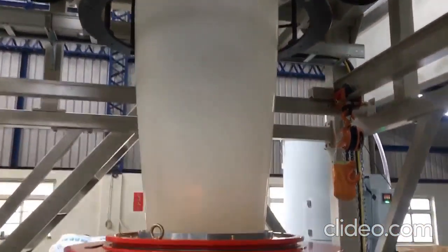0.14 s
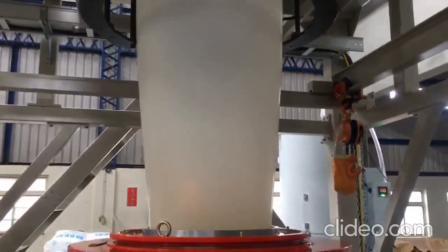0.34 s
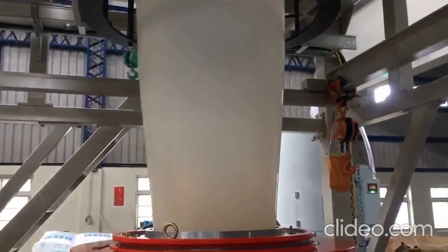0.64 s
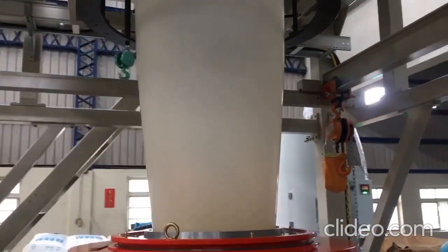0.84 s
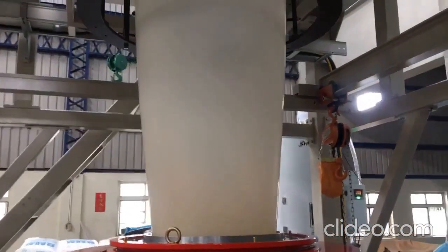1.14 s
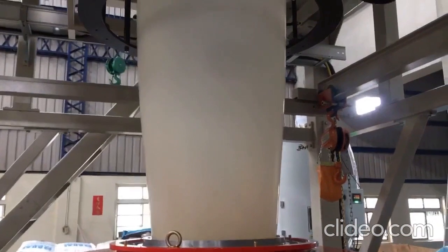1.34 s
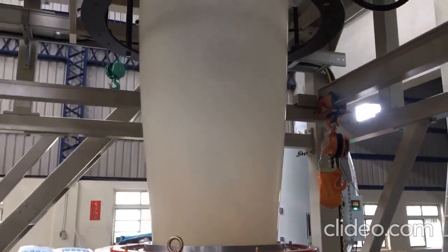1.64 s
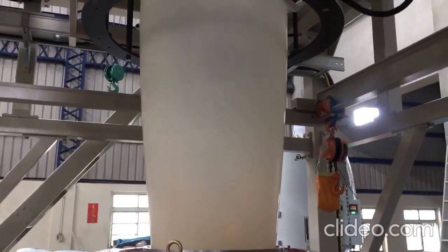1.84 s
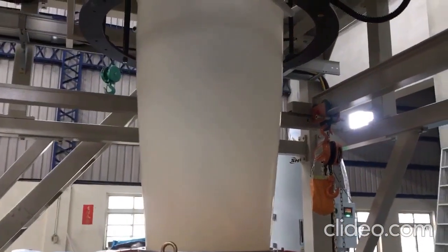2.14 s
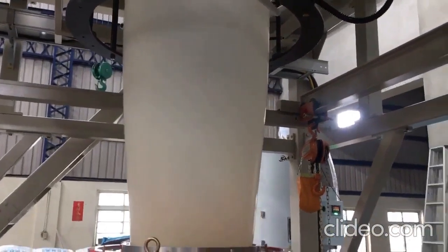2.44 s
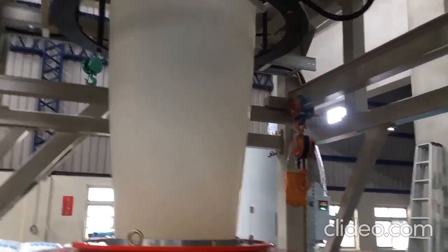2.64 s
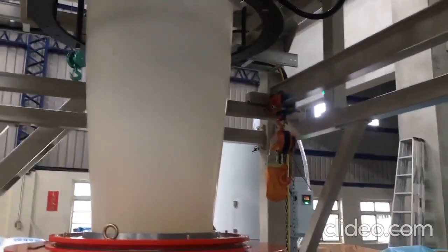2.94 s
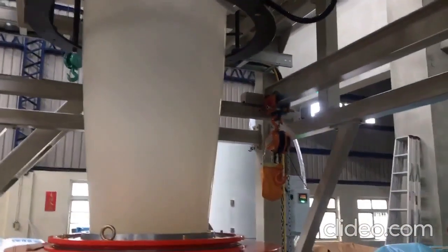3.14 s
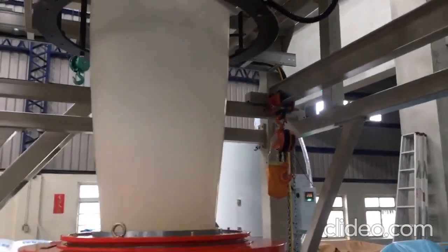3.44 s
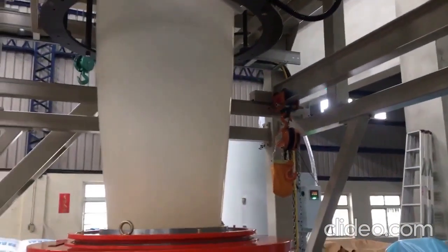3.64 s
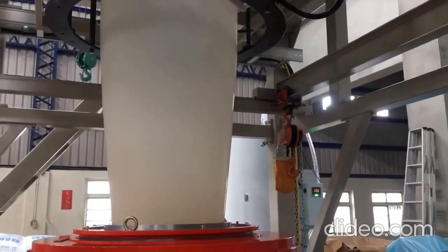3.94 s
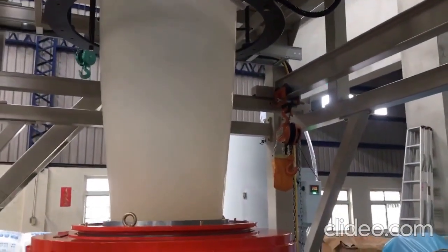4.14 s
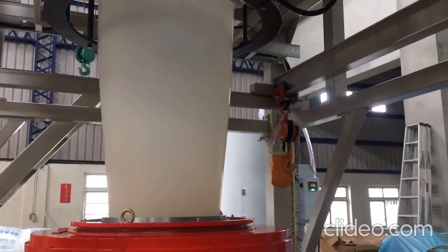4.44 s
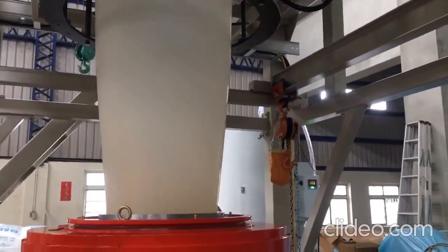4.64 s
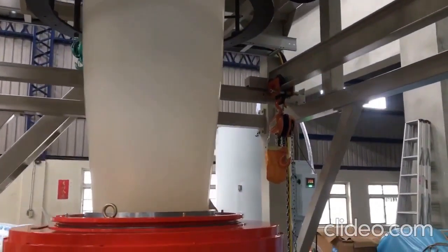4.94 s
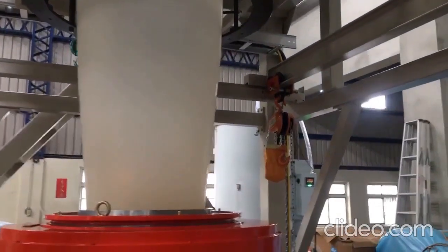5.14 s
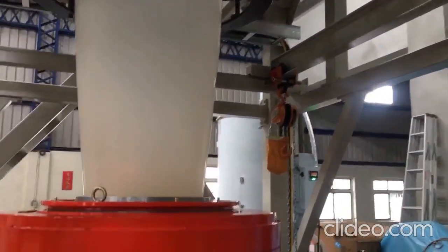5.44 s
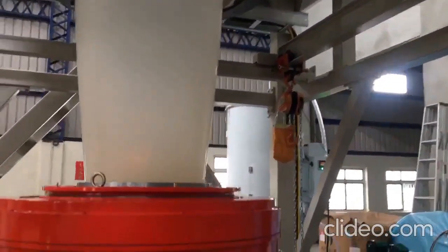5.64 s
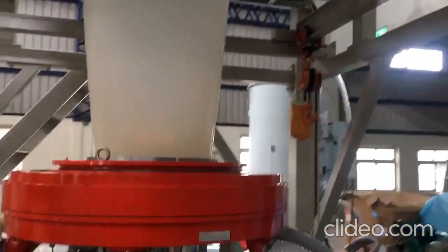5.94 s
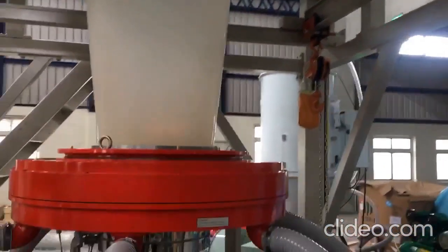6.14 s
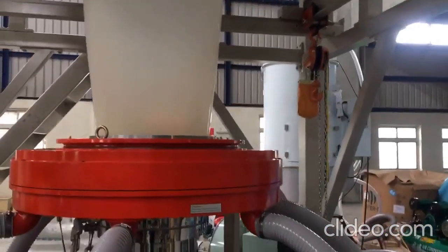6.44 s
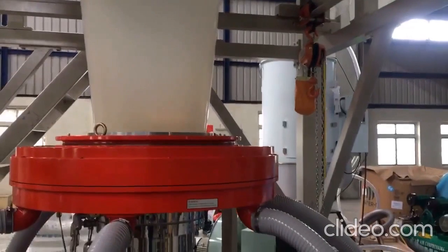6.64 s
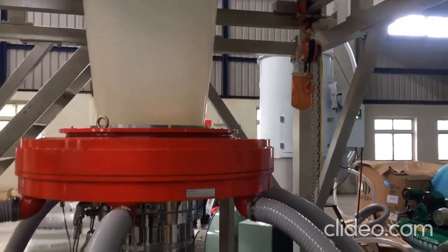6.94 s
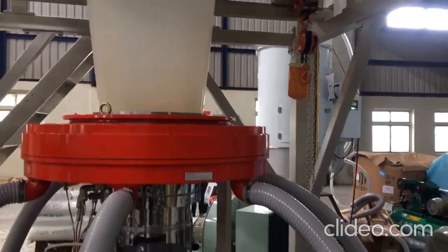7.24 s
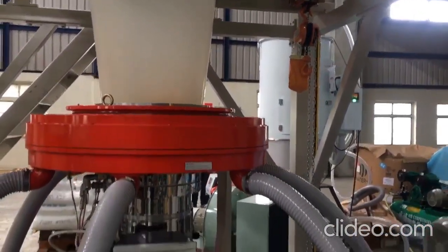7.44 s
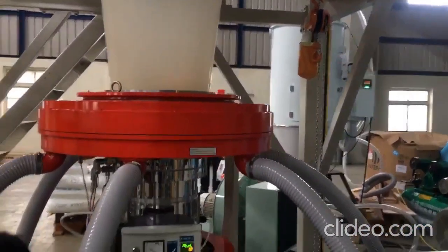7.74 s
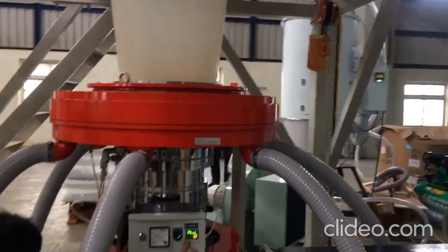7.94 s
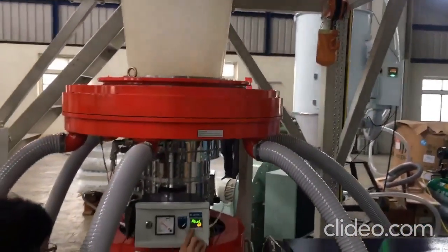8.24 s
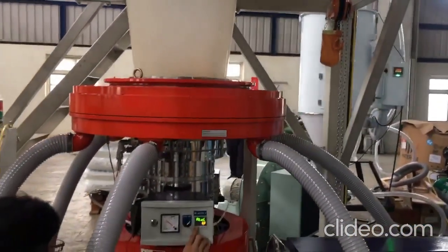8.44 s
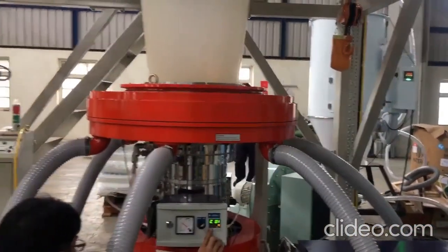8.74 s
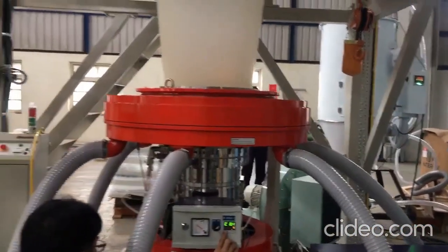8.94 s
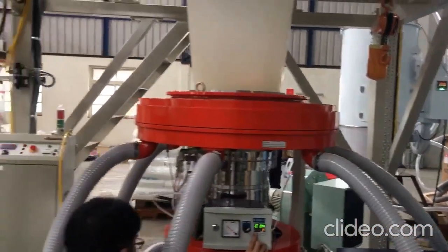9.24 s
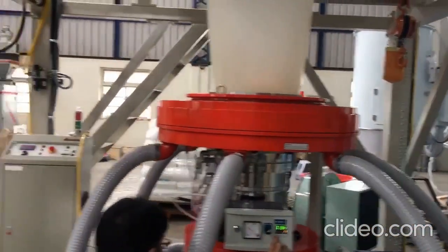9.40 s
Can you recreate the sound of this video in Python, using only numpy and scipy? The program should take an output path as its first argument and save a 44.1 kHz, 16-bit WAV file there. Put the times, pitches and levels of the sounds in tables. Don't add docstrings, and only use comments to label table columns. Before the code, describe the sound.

Continuous factory machine noise: low humming fan rumble, hollow rushing air and piercing electric drive whine that swells and fades, with one tiny air spit.

```python
import sys
import numpy as np
from scipy import signal
from scipy.fft import rfft, irfft, next_fast_len
from scipy.io import wavfile
from scipy.ndimage import uniform_filter1d, map_coordinates

SR = 44100
rng = np.random.default_rng(int(sys.argv[2]) if len(sys.argv) > 2 else 0)


def ratio_of_db(decibels):
    return 10 ** (np.asarray(decibels, float) / 20)


def store_pcm(level_fs):
    pcm = np.round(np.clip(level_fs, -1, 1) * 32767).astype(np.int16)
    wavfile.write(sys.argv[1], SR, np.atleast_2d(pcm).T)


N = 422037

# (frequency [Hz], density [dB per Hz])
RUMBLE_SPECTRUM = [(12, -51), (20, -25.5), (56, -10), (108, -8), (133, -6), (151, 1.5), (257, -0.5),
                   (283, -4), (312, -8), (369, -4), (442, -11.5), (560, -22), (730, -29.5), (1230, -120)]
ROAR_SPECTRUM = [(350, -58), (480, -6.5), (600, -1), (730, -3.5), (1000, -3), (1190, -6), (1650, -7.5),
                 (1800, -3), (2100, -6.5), (2450, -13.5), (2660, -22.5), (2900, -34)]
SLOT_SPECTRUM = [(2300, -31), (2550, -5), (2670, -8), (2800, -1), (3400, -1), (3800, -1), (4000, -6),
                 (4100, -5.5), (4400, -32.5)]
HISS_SPECTRUM = [(3900, -33), (4100, 1), (4400, 0.5), (4820, -2), (4930, -4), (5150, -1.5), (5900, -3),
                 (6150, -3.5), (6700, -4), (7200, -6.5), (7600, -7), (8600, -7), (9300, -5)]
# (frequency [Hz], density [dB per Hz])
FUZZ_SPECTRUM = [(7200, -27), (7500, -11), (8000, 0), (8150, -4), (8300, -6.5), (8520, -9), (8650, -14),
                 (9300, -20)]

# (frequency [Hz], width [Hz], level over the rumble [dB])
CASING_MODES = [(145.7, 13, 6.5), (163, 3.3, -0.5), (184.7, 7.6, 5.5), (237.4, 5.6, -5), (297, 32, 2),
                (333.6, 7.5, 3.5), (73, 6.8, -4)]
# (frequency [Hz], width [Hz], level [dB])
LOW_HOSE_MODES = [(620, 45, -2), (658, 55, 0), (692, 30, -4)]
HIGH_HOSE_MODES = [(1005, 40, -4), (1040, 60, 0), (1095, 55, -1.5)]
# (frequency [Hz], width [Hz], level over the roar [dB])
RING_MODES = [(785, 55, 4), (840, 55, 4), (900, 45, 3), (1238, 26, 7), (1295, 18, 4.5), (1347, 16, 1),
              (1430, 30, 6), (1575, 32, 6), (1755, 45, 3), (2000, 35, 1), (2135, 35, 0)]
# (frequency [Hz], width [Hz], level over the slot noise [dB])
LIP_MODES = [(2545, 60, 1), (2795, 90, 2), (2925, 45, 1), (3120, 70, 1), (3280, 90, 0), (3720, 100, 0)]

# (frequency [Hz], mean level [dB])
MACHINE_TONES = [(484.7, -54), (1656.9, -49), (4085, -67), (4884.7, -78), (4962.2, -75), (5028.3, -74),
                 (5110.5, -68), (5908, -79), (6684.8, -76), (6935, -79)]
FIRST_SIDEBANDS = [-72.0, -79.0, -78.0, -70.0, -75.0, -77.0, -71.0, -73.0, -74.0, -70.0, -71.0, -73.0,
                   -65.0, -67.0, -68.0, -63.0, -60.0, -57.0, -55.0, -51.0, -57.0, -54.0, -53.0, -64.0,
                   -66.0, -65.0, -72.0]
SECOND_SIDEBANDS = [-65.0, -63.0, -71.0, -51.0, -56.0, -74.0, -52.0, -60.0, -81.0, -65.5, -67.0, -85.0,
                    -69.0, -72.0]
THIRD_SIDEBANDS = [-73.0, -73.0, -64.0, -69.0, -70.0, -68.0]
LOWEST_ORDERS = (-19, -3, -2)

# (time [s], length [s], frequency [Hz])
WHISTLE = (.78, .58, 6165)
# (time [s], length [s], frequency [Hz])
SPIT = (5.33, .03, 5200)

# (time [s], distance nearer the drives [m])
WALK_PATH = [
    (0, 0),
    (2.9, .06),
    (4.6, .03),
    (5.2, .12),
    (6.2, .27),
    (7, .22),
    (8, .18),
    (8.6, .17),
    (9.6, .05),
]
# (time [s], turn from the blower [0-1], tilt under the slot's air [0-1])
MIC_AIM = [
    (0, 0.3, 0.5),
    (1.3, 0.1, 0),
    (4.6, 0.4, .3),
    (5.6, 0.1, 1),
    (6.4, 0.18, 0.8),
    (7.2, 0.5, 1),
    (8.8, 1, 0.5),
    (9.6, 0.4, 0),
]
# (rumble [dB], low hose [dB], high hose [dB], roar [dB])
TURN_LOSS = (1.6, 2, 0.66, 0.31)
# (slot [dB], hiss [dB])
TILT_LOSS = (2, 0.55)

# (time [s], length [s], gain [dB])
LOW_HOSE_CRESTS = [
    (.5, 0.94, 5.5),
    (1.5, .9, 2.5),
    (2.85, .5, 4.5),
    (4.3, 1.4, 4),
    (5.65, 0.85, 7),
    (6.6, .6, 5.5),
    (7.5, 0.32, 2),
]
HIGH_HOSE_CRESTS = [
    (.05, 0.43, 2.2),
    (1.65, .6, 1.9),
    (3.4, 1.1, 2.5),
    (4.6, 1.1, 3),
    (5.65, .9, 2.8),
    (8.6, 0.9, 1.8),
]
# (time [s], length [s], gain [dB])
FIRST_WHINE_CRESTS = [
    (0, .3, 3.5),
    (.75, .5, 5),
    (3.1, 0.64, 2.5),
    (4.2, .8, 4),
    (5.75, .5, 4.5),
    (6.25, 0.46, 3),
    (7.1, .5, 1.5),
    (8.15, .3, 2.1),
    (8.75, .5, 5),
]
SECOND_WHINE_CRESTS = [
    (.6, .4, 2.5),
    (1.15, .5, 4.4),
    (1.8, 0.57, 5),
    (2.7, 1.1, 5.8),
    (4.1, 0.51, 3),
    (5.05, .6, 3.3),
    (5.7, 0.37, 2.4),
    (8.9, .4, 1.4),
]


def unit(x):
    return x / np.sqrt(np.mean(np.abs(x) ** 2) + 1e-20)


def curves(rows):
    s, *cols = np.transpose(rows)
    return [np.interp(np.arange(N) / SR, s, c) for c in cols]


def wobble(rate):
    return map_coordinates(rng.standard_normal(200), [np.arange(0, N, 64) * rate / SR])


def crests(rows):
    t = np.arange(0, N, 64) / SR
    swells = sum(db * np.exp(-(2 * (t - s) / length) ** 2) for s, length, db in rows)
    return np.interp(np.arange(N) / SR, t, swells)


def humps(modes, hz):
    return sum(ratio_of_db(db) ** 2 / (1 + (2 * (hz - c) / w) ** 2) ** 1.88 for c, w, db in modes)


def rush(spectrum=None, modes=(), patchy_db=1.2):
    z = signal.stft(rng.standard_normal(N + 8192), nperseg=1024)[2]
    patches = uniform_filter1d(rng.standard_normal(z.shape), size=5, axis=0)
    patches = uniform_filter1d(patches, size=12, axis=1)
    noise = signal.istft(z * ratio_of_db(patchy_db * unit(patches)), nperseg=1024)[1]
    m = next_fast_len(len(noise))
    hz = np.fft.rfftfreq(m, 1 / SR)[:m // 4]
    gain = np.sqrt(humps(modes, hz) + (spectrum is not None))
    if spectrum is not None:
        f, db = np.transpose(spectrum)
        gain = gain * ratio_of_db(np.interp(np.log(hz + 1), np.log(f + 1), db, left=-120, right=-120))
    return unit(irfft(rfft(noise, m)[:m // 4] * gain, m)[:N])


def tone(hz, paths):
    turn = lambda n: np.exp(2j * np.pi * hz / SR * n)
    blocks = np.outer(paths * turn(np.arange(0, N, 64)), turn(np.arange(64)))
    return np.sqrt(2) * blocks.imag.ravel()[:N]


def fading(hz, db, rate):
    return tone(hz, ratio_of_db(db) * unit(wobble(rate) + 1j * wobble(rate)))


def walked(hz, db):
    near = np.interp(np.arange(0, N, 64) / SR, *np.transpose(WALK_PATH))
    sway_hz, fades_per_m, sound_m_s = 1.8, 25, 343
    travelled = np.cumsum(np.abs(np.gradient(near)))
    clock = sway_hz * np.arange(0, N, 64) / SR + fades_per_m * travelled
    re, im = (map_coordinates(knots, [clock]) for knots in rng.standard_normal((2, 60)))
    direct = 1.0
    flutter = ratio_of_db(1.2 * wobble(14)) * np.exp(.5j * wobble(5))
    shift = np.exp(2j * np.pi * (hz * near / sound_m_s + rng.random()))
    return tone(hz, ratio_of_db(db) * unit((direct + re + 1j * im) * flutter * shift))


def blower():
    full_db = np.array([[-28], [-39], [-36], [-30.5]])
    rumble_db, low_db, high_db, roar_db = full_db - np.outer(TURN_LOSS, curves(MIC_AIM)[0])
    rumble = ratio_of_db(rumble_db) * rush(RUMBLE_SPECTRUM, CASING_MODES, patchy_db=-0.55)
    low = ratio_of_db(low_db + crests(LOW_HOSE_CRESTS)) * rush(modes=LOW_HOSE_MODES, patchy_db=-0.4)
    high = ratio_of_db(high_db + crests(HIGH_HOSE_CRESTS)) * rush(modes=HIGH_HOSE_MODES, patchy_db=1.1)
    roar = ratio_of_db(roar_db) * rush(ROAR_SPECTRUM, RING_MODES, patchy_db=1.18)
    return rumble + low + high + roar


def slot_air():
    full_db = np.array([[-44], [-48.5]])
    slot_db, hiss_db = full_db - np.outer(TILT_LOSS, curves(MIC_AIM)[1])
    slot = ratio_of_db(slot_db) * rush(SLOT_SPECTRUM, LIP_MODES, patchy_db=1.95)
    return slot + ratio_of_db(hiss_db) * rush(HISS_SPECTRUM, patchy_db=2.47)


def drive(centre_hz, family, lowest, gain_db):
    run_hz = 41.72
    return sum(walked(centre_hz + k * run_hz, db + gain_db) for k, db in enumerate(family, lowest))


def drives():
    first = drive(7978.1, FIRST_SIDEBANDS, LOWEST_ORDERS[0], gain_db=0.1)
    second = drive(8338.6, SECOND_SIDEBANDS, LOWEST_ORDERS[1], gain_db=0.3)
    third = drive(7535.1, THIRD_SIDEBANDS, LOWEST_ORDERS[2], gain_db=-1.0)
    whine = ratio_of_db(crests(FIRST_WHINE_CRESTS)) * (first + third) + ratio_of_db(crests(SECOND_WHINE_CRESTS)) * second
    return whine + ratio_of_db(-51.5) * rush(FUZZ_SPECTRUM, patchy_db=0.0)


def gears_and_blades():
    return sum(fading(hz, db - .7, rate=3.5) for hz, db in MACHINE_TONES)


def whistle():
    s, length, hz = WHISTLE
    swell = np.clip(1 - (2 * (np.arange(N) / SR - s) / length - 1) ** 4, 0, 1)
    breath = ratio_of_db(-60) * rush(modes=[(hz, 40, 0)], patchy_db=0)
    pitch = tone(hz, ratio_of_db(-59.5 + 2 * wobble(9)) * np.exp(1.5j * wobble(9)))
    return swell * (breath + pitch)


def air_spit():
    s, length, hz = SPIT
    late = np.clip(np.arange(N) / SR - s, 0, None) / length
    return ratio_of_db(-26.5) * late * np.exp(-2.5 * late) * rush(modes=[(hz, 3600, 0)])


def scene():
    return (blower() + slot_air() + drives() + gears_and_blades() + whistle() + air_spit())[None]


def low_pass(x):
    return signal.sosfilt(signal.butter(12, 9210, fs=SR, output="sos"), x)


def record(dry):
    return low_pass(dry)


dry = scene()
out = record(dry)
store_pcm(out)
```